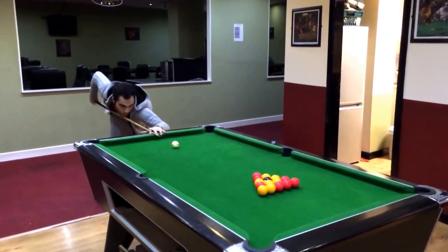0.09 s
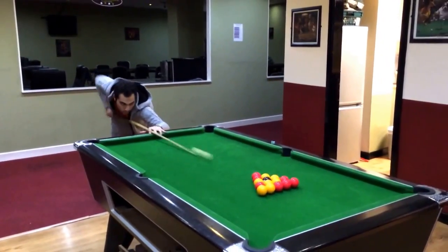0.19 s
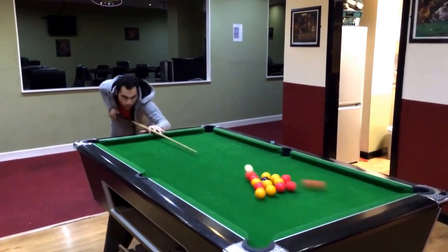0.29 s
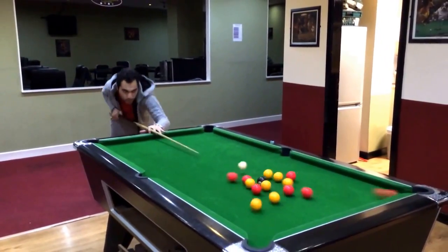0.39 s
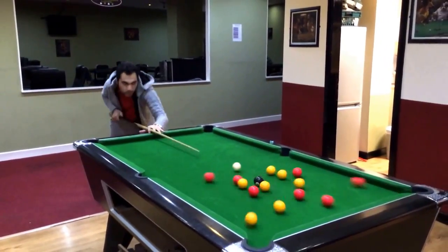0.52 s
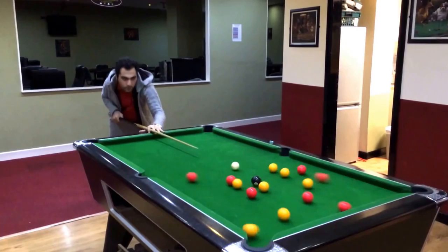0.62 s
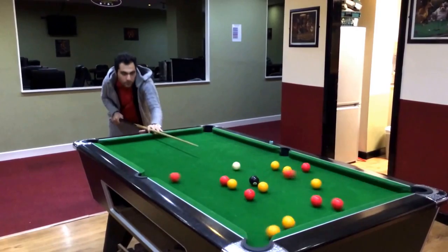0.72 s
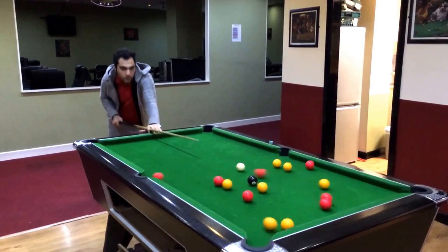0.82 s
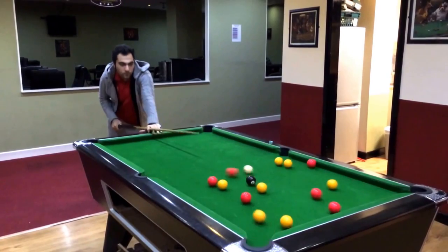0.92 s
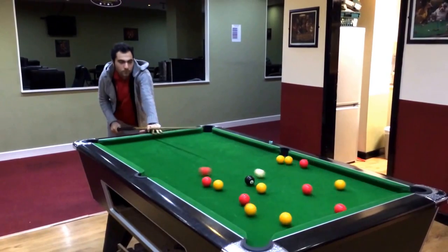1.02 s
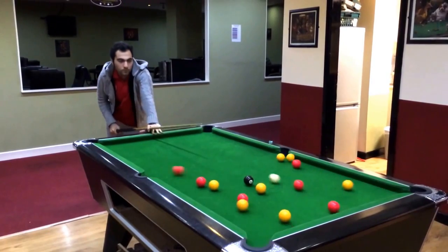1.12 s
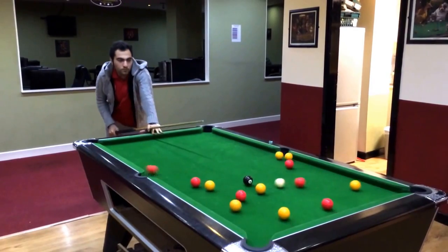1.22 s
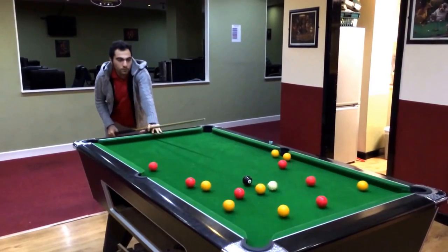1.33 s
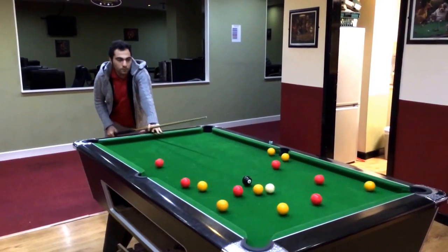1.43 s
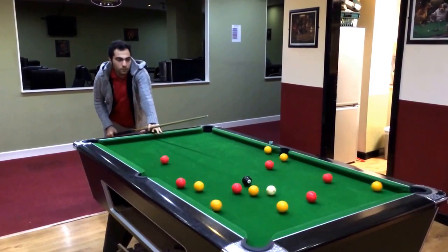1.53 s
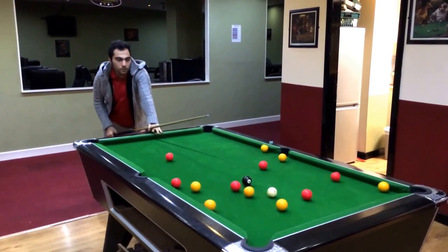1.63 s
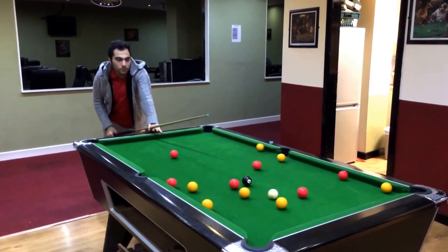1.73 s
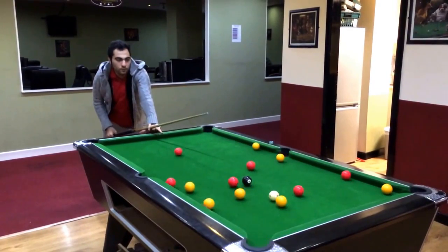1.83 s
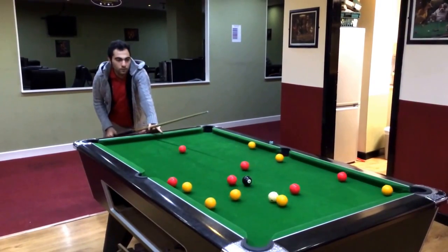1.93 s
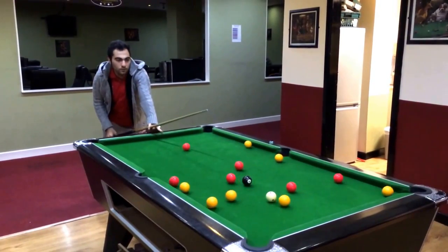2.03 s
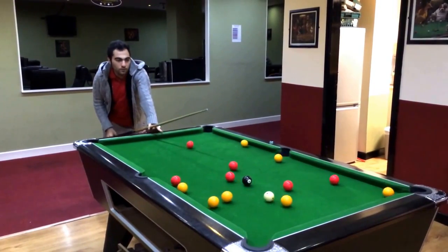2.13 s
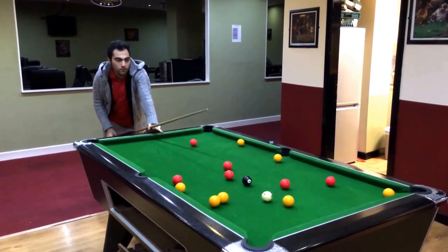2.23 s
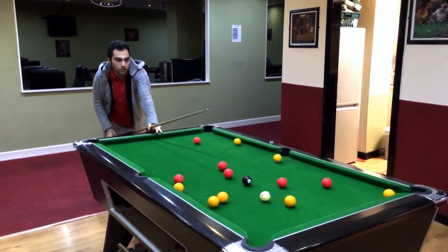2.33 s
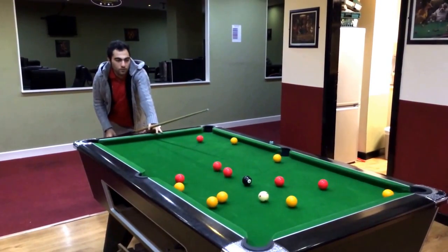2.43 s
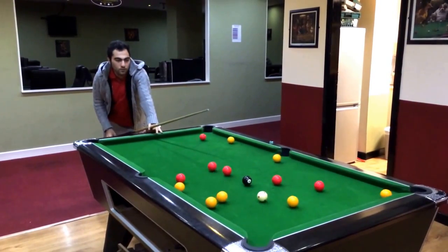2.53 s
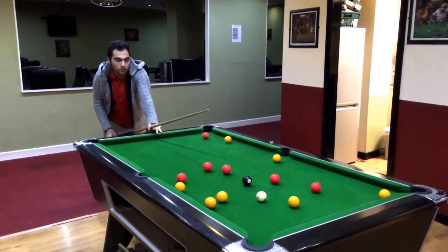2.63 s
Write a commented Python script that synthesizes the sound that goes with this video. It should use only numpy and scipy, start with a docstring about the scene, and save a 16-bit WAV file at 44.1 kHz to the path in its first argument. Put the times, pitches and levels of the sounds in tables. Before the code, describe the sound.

A pool break: a cue strike, a loud crack of balls, scattered clicks and wooden knocks

```python
"""In a room with a slate-bed ball table, a cue strikes and the cue ball cracks into the rack.
Hard balls click by short pressure pulses; cue, cabinet and thin part ring as modes under bursts of impacts.
Cushions thump as low damped sines, knocks on wood are filtered decaying noise, and balls roll as
coloured noise. A cooler hums as a steady sine; room air is a bed of noise and sparse taps reverberate."""
import sys
import numpy as np
from scipy import signal
from scipy.fft import rfft, irfft
from scipy.io import wavfile
from scipy.ndimage import uniform_filter1d

SR = 44100
rng = np.random.default_rng(int(sys.argv[2]) if len(sys.argv) > 2 else 0)


def store_pcm(level_fs):
    """Save levels as 16-bit WAV."""
    pcm = np.round(np.clip(level_fs, -1, 1) * 32767).astype(np.int16)
    wavfile.write(sys.argv[1], SR, np.atleast_2d(pcm).T)


N = 119070  # samples, 2.7 s


def amp(db):
    """Logarithmic level: decibels become an amplitude ratio."""
    return 10 ** (np.asarray(db) / 20)


def evened(x):
    """Normalization of power: the rms becomes 1."""
    return x / np.sqrt(np.mean(x ** 2) + 1e-20)


def unit(x):
    """Normalization of energy: the sum of squares becomes 1."""
    return x / np.linalg.norm(x)


def read(points, hz):
    """Interpolation of a curve along a logarithmic frequency axis."""
    f, value = np.transpose(points)
    return np.interp(np.log(hz + 1), np.log(f + 1), value)


def add(mix, s, sound):
    """Superposition: a sound is summed into the mix from time s [s]."""
    part = mix[round(s * SR):][:len(sound)]
    part += sound[:len(part)]


def decay(t, t60):
    """Exponential damping: the level falls 60 dB in t60 [s]."""
    return amp(-60 * t / t60)


def level_curve(points):
    """Amplitude envelope: levels in dB are joined by straight lines over time."""
    return amp(np.interp(np.arange(N) / SR, *np.transpose(points)))


def coloured(x, points):
    """Linear filtering: the spectrum is weighted by a curve in dB."""
    return irfft(rfft(x) * amp(read(points, np.fft.rfftfreq(len(x), 1 / SR))), len(x))


PAIR_SPREAD = 0.01  # greatest offset of a pair from its mode, as a fraction of the frequency


def modes(table, length, drive):
    """Modal superposition: the drive excites damped sines, each a close beating pair; energy 1."""
    t = np.arange(0, length, 1 / SR)
    total = 0
    for hz, db, t60 in table:
        beat = np.cos(2 * np.pi * hz * PAIR_SPREAD * rng.random() * t)
        ring = decay(t, t60) * np.sin(2 * np.pi * hz * t) * beat
        total = total + amp(db) * np.sqrt(t60) * unit(signal.fftconvolve(drive, ring))
    return unit(total)


def tail(t60s, gap_s, size=SR, hold_s=0):
    """Reverberation: sparse taps of random sign, each band with its own decay time; energy 1."""
    taps = np.zeros(size)
    at = np.arange(0, size - 16, 16)
    taps[at + rng.integers(0, 16, len(at))] = rng.choice([-1., 1.], len(at))
    hz, t, bands = signal.stft(taps, SR, nperseg=256)
    held_t = np.hypot(t, hold_s) - hold_s  # the decay sets in gradually over the hold
    bands = bands * decay(held_t, read(t60s, hz)[:, None])
    out = signal.istft(bands, SR, nperseg=256)[1][:size]
    onset = np.minimum(np.arange(size) / SR / gap_s, 1) ** 2
    return unit(out * onset)


def burst(rise_s, fade_s, per_s, spread_db):
    """Random point process: a rattle of small impacts that swells and fades; norm 20."""
    t = np.arange(0, .2, 1 / SR)
    where, size, sign = rng.random((len(t), 3)).T
    hits = (where < per_s / SR) * amp(-spread_db * np.log(size + 0.00089)) * np.sign(sign - .5)
    envelope = np.minimum(t / rise_s, 1) * np.exp(-np.maximum(t - rise_s, 0) / fade_s)
    return unit(hits * envelope) * 20


# spectrum of the room air: (frequency [Hz], relative level [dB])
AIR_COLOUR = [(25, -28), (175, 15.5), (394, -27.5), (591, -27.5), (14800, -26), (16000, -75)]
AIR_DB = -60.5  # rms


def room_air():
    """Stationary random noise: the coloured bed of the room air."""
    return amp(AIR_DB) * evened(coloured(rng.standard_normal(N), AIR_COLOUR))


# tone of the cooler: (frequency [Hz], rms level [dB])
COOLER_TONES = [(217, -54)]


def cooler_hum():
    """Steady harmonic motion: the cooler hums as a sine with a random starting phase."""
    t = np.arange(N) / SR
    return sum(amp(db) * np.sqrt(2) * np.sin(2 * np.pi * (hz * t + rng.random()))
               for hz, db in COOLER_TONES)


# loudness of balls rolling on the cloth: (time [s], level [dB])
ROLL_LEVEL = [(.21, -51), (.25, -33), (.5, -38), (.95, -51), (1.15, -25.5), (1.4, -48), (1.65, -46),
              (1.9, -47.5), (2.5, -40), (2.7, -46.5)]
# spectrum of the rolling: (frequency [Hz], relative level [dB])
ROLL_COLOUR = [(40, -5), (130, -1), (204, 0.5), (300, -5), (394, 0), (500, -12.5), (930, -11.5),
               (2500, -24.5), (7600, -47.5), (16000, -68.5)]


def rolling():
    """Rolling-contact noise: a random rumble follows the level of the balls on the cloth."""
    return level_curve(ROLL_LEVEL) * evened(coloured(rng.standard_normal(N), ROLL_COLOUR))


# modes of the cue: (frequency [Hz], relative level [dB], decay time t60 [s])
CUE_MODES = [(780, -11.5, 0.0276), (1090, -13, 0.034), (1642, -14.5, 0.11), (1807, -3, 0.053),
             (3020, -1, 0.033), (3584, -13.5, 0.058), (4780, -17, 0.05), (5100, -21, 0.084)]
# spectrum of the strike's hiss: (frequency [Hz], level [dB])
CUE_HISS = [(100, -12.5), (2320, -21.5), (3050, -18), (13200, -44), (16000, -70)]
# decay of the hiss: (frequency [Hz], t60 [s])
CUE_WASH_T60 = [(500, 0.38), (8000, 0.16)]
CUE_S, CUE_DB, CUE_HISS_DB = .2232, -9.5, -6.5  # hiss relative to the cue
CUE_SWELL_S, CUE_FADE_S = 0.013, 0.0069
TIP_HZ, TIP_DB, TIP_T60 = 1072, -1.5, 0.014  # t60 in s


def cue():
    """Modal excitation by impact: the tip thumps while the shaft's modes swell and ring."""
    out, t = np.zeros(N), np.arange(0, .05, 1 / SR)
    drive = burst(CUE_SWELL_S, CUE_FADE_S, 8000, 1.0)
    shaft = modes(CUE_MODES, .4, drive)
    hiss = signal.fftconvolve(coloured(drive, CUE_HISS), tail(CUE_WASH_T60, 0.0031, size=SR // 4))
    tip = -amp(TIP_DB) * decay(t, TIP_T60) * np.sin(2 * np.pi * TIP_HZ * t)
    add(out, CUE_S, amp(CUE_DB) * 20 * shaft)
    add(out, CUE_S, amp(CUE_DB + CUE_HISS_DB) * 20 * hiss)
    add(out, CUE_S, tip)
    return out


CLACK_TURNS = 0.54  # width of the pulse, in cycles
CLACK_RING_T60, SPARK_DB, SPARK_S = 0.0099, -42, .002  # s, dB, s


def clack(db, hz, ring_db):
    """Impact radiation: two hard balls push a brief pulse of air, with a ring and a bright spark."""
    t = np.arange(-441, 442) / SR  # the pulse is centred 10 ms in
    late = np.maximum(t, 0)
    wave = np.sin(2 * np.pi * hz * t)
    pulse = wave * np.exp(-(t * hz / CLACK_TURNS) ** 2)
    ring = wave * (1 - np.exp(-(late * hz) ** 2)) * amp(ring_db) * decay(late, CLACK_RING_T60)
    bright_noise = np.gradient(np.gradient(rng.standard_normal(len(t))))
    spark = bright_noise * (t >= 0) * np.exp(-late / SPARK_S)
    return amp(db) * (pulse / pulse.max() + ring + amp(SPARK_DB) * spark)


# scattered clicks: pitches [Hz]
SCATTER_HZ = (2100, 2600, 3000, 3300)
SCATTER_S, SCATTER_SWELL_S, SCATTER_T60 = .347, 0.014, 0.41  # start, swell and decay in s
SCATTER_PER_S = 3400  # clicks per second, all pitches together, at full density
SCATTER_DB, SCATTER_RING_DB = -20.5, 0.5
SCATTER_SPREAD_DB = 2  # dB per unit of the log of a random size


def scatter():
    """Random point process: clicks of four pitches die away as the rack spreads."""
    out, t = np.zeros(N), np.arange(N) / SR - SCATTER_S
    swell = np.clip(.5 + t / SCATTER_SWELL_S / 2, 0, 1) * (t > 0)
    for hz in SCATTER_HZ:
        where, size = rng.random((N, 2)).T
        sizes = amp(-SCATTER_SPREAD_DB * np.log(size + 1e-3))
        train = (where < SCATTER_PER_S / 4 / SR) * swell * sizes * decay(abs(t), SCATTER_T60)
        out += signal.oaconvolve(train, clack(SCATTER_DB, hz, SCATTER_RING_DB), "same")
    return out


# ball on ball: (time [s], pulse level [dB], pitch [Hz], ring level re pulse [dB])
BALL_CLACKS = [(0.3462, 0, 1890, -19), (0.3483, -8.5, 2780, -18), (0.357, -3, 2710, -5),
               (0.371, -8.5, 3080, 6), (0.3753, -8.5, 2620, -12), (0.3847, -4, 2730, -11),
               (0.3919, -6.5, 2000, -22), (0.4098, -10, 2330, -4), (.452, -21, 2340, 5),
               (0.8036, -9, 2070, -14), (0.8825, -24.5, 2470, -7), (0.8941, -17.5, 2130, -14),
               (1.1857, -3.5, 2190, -9.5), (1.2701, -7.5, 2320, -7.5), (1.28, -17, 1860, -3),
               (1.471, -19.5, 2290, -8), (1.481, -25.5, 2037, -11), (2.317, -24.5, 2110, -11)]
# echoes off slate and rails: (delay [s], level [dB])
CLACK_ECHOES = [(0.0123, -20.5)]
# dense scatter off nearby balls and rails: (frequency [Hz], t60 [s])
NEAR_T60 = [(1000, 0.15), (3000, 0.069), (10000, 0.028)]
NEAR_DB = -8.5


def balls():
    """Impact and reflection: loud clacks and scattered clicks return off balls, slate and rails."""
    out = np.zeros(N)
    for s, db, hz, ring_db in BALL_CLACKS:
        add(out, s - .01, clack(db, hz, ring_db))
    out += scatter()
    near = signal.oaconvolve(out, tail(NEAR_T60, 0.0016, size=SR // 4))[:N]
    echoed = out + amp(NEAR_DB) * near
    for s, db in CLACK_ECHOES:
        add(echoed, s, amp(db) * out)
    return echoed


# knocks on wood: (time [s], level [dB], pitch [Hz], sharpness Q [1], rise [s], hold [s],
# boom re knock [dB], treble re knock [dB])
WOOD_KNOCKS = [(0.5127, -18, 1030, 1.2, 0.0032, 0.016, -7, -55),
               (0.615, -28.5, 780, 2.5, 0.0054, 0.004, -4, -92),
               (1.0046, -17.5, 1054, 1.4, 0.0015, 0.0033, -8.5, -29.5),
               (1.074, -14.5, 2800, 0.55, 0.0048, 0.026, -4.5, -16.5),
               (1.112, -20.5, 1020, 2.6, 0.005, 0.1, -11, -17.5),
               (1.21, -25.5, 965, 4.4, 0.0016, 0.15, -14, -43),
               (1.234, -27, 6140, 0.55, 0.0093, 0.06, -4, -22.5),
               (1.314, -31, 910, 3.4, 0.0014, 0.0094, -28, -26.5),
               (1.914, -10.5, 1700, 0.45, 0.0079, 0.042, -9, -34.5),
               (2.037, -22.5, 750, 1.04, 0.0081, 0.012, 3, -46.5),
               (2.147, -13.5, 1570, 0.45, 0.0069, 0.031, -2.5, -35),
               (2.201, -30.5, 550, 2.3, 0.0025, 0.0087, 10, -35),
               (2.318, -20, 1130, 1.2, 0.015, 0.025, -1, -49),
               (2.362, -26.5, 510, 1.7, 0.0034, 0.0057, 10, -57),
               (2.397, -26.5, 452, 1.2, 0.011, 0.045, -4, -53),
               (2.515, -27, 620, 0.59, 0.0072, 0.01, -5.5, -37)]
# spectrum of the wooden panel: (frequency [Hz], relative level [dB])
WOOD_COLOUR = [(100, -28), (250, 1), (480, 1.5), (1000, 4.5), (3000, 2.5), (6000, -4.5), (16000, -35)]
# decay of the panel: (frequency [Hz], t60 [s])
WOOD_T60 = [(200, 0.4), (1000, 0.24), (4000, 0.15), (12000, 0.067)]
# low modes of the cabinet: (frequency [Hz], relative level [dB], t60 [s])
CABINET_MODES = [(105, -10.5, 0.58), (115.5, -9, 0.64), (185.9, 0.5, 0.69), (216.6, 0.5, 0.42),
                 (283, -6, 0.49), (371, 11, 0.096), (453.6, 8, 0.11), (540, -1, 0.62), (965, -15, 0.63)]
# treble band of the knocks: lower and upper edge [Hz]
TREBLE_HZ = (2640, 7530)
TREBLE_T60 = 0.37  # s, on top of the panel's own decay
RATTLE_PER_S, RATTLE_SPREAD_DB = 2300, 4.5  # impacts per second; dB per unit of log size
LUMP_S, LUMP_DB = .004, 2.5  # smoothing of the level's wobble and its rms
FIRST_BLOW = 0.14  # one sample, against a panel of energy 1


def shudder(rise_s, hold_s):
    """Amplitude modulation: the panel's noise dies with a lumpy level, and one blow stands at its rise."""
    panel = tail(WOOD_T60, rise_s, size=SR // 2, hold_s=hold_s)
    lumps = evened(uniform_filter1d(rng.standard_normal(len(panel)), round(LUMP_S * SR)))
    panel = unit(panel * amp(LUMP_DB * lumps))
    add(panel, rise_s, np.array([FIRST_BLOW]))
    return panel


def knocks():
    """Resonant filtering: a panel shudders about its own pitch and the cabinet's low modes boom."""
    out = np.zeros(N)
    for s, db, hz, sharp, rise_s, hold_s, boom_db, treble_db in WOOD_KNOCKS:
        drive = burst(rise_s, hold_s, RATTLE_PER_S, RATTLE_SPREAD_DB)
        panel = shudder(rise_s, hold_s)
        w = 2 * np.pi * hz
        resonance = signal.bilinear([1], [1 / w ** 2, 1 / (w * sharp), 1], SR)  # low-pass with peak Q
        soft = signal.lfilter(*resonance, coloured(panel, WOOD_COLOUR))
        hard = signal.lfilter(*signal.butter(2, TREBLE_HZ, "band", fs=SR), panel)
        hard = hard * decay(np.arange(len(hard)) / SR, TREBLE_T60)
        add(out, s, 20 * amp(db) * (unit(soft) + amp(treble_db) * unit(hard)))
        add(out, s, 20 * amp(db + boom_db) * modes(CABINET_MODES, 1.0, drive))
    return out


# cushion thumps: (time [s], level [dB], pitch [Hz])
CUSHION_THUMPS = [(0.75, -29.5, 113.8), (0.852, -36, 109), (0.894, -32.5, 111), (1.351, -28.5, 92.7)]
THUMP_RISE_S, THUMP_T60 = 0.0012, 0.19  # s


def thumps():
    """Damped oscillation: rubber cushions push the frame into a low soft ring."""
    out, t = np.zeros(N), np.arange(0, .3, 1 / SR)
    envelope = decay(t, THUMP_T60) * (1 - np.exp(-t / THUMP_RISE_S))
    for s, db, hz in CUSHION_THUMPS:
        add(out, s, amp(db) * envelope * 2 * np.sin(2 * np.pi * hz * t))
    return out


# loudness of a potted ball running down its channel: (time [s], level [dB])
CHANNEL_LEVEL = [(1.0, -90), (1.12, -44), (1.3, -56.5), (1.95, -53), (2.1, -37.5), (2.3, -35),
                 (2.42, -37.5), (2.6, -46), (2.7, -71.5)]


def channel_run():
    """Modal response to random forcing: a potted ball in its channel rings the cabinet's modes."""
    ringing = modes(CABINET_MODES, 0.57, rng.standard_normal(N))[:N]
    return level_curve(CHANNEL_LEVEL) * evened(ringing)


# light ticks on a thin part: (time [s], level [dB])
THIN_TICKS = [(2.415, -29), (2.528, -33.5), (2.569, -39.5)]
# modes of the thin part: (frequency [Hz], relative level [dB], t60 [s])
THIN_MODES = [(1800, -16, 0.033), (2206, 5, 0.1), (2446, 19.5, 0.027), (3100, 3, 0.054), (3660, 4.5, 0.08),
              (4040, 4, 0.11), (5140, -9, 0.032), (6900, -21, 0.08)]
# spectrum of the ticks' wash: (frequency [Hz], relative level [dB])
TICK_HISS = [(1000, 3.5), (2200, 9.5), (4500, -3.5), (8000, -17), (16000, -40)]
# decay of the wash: (frequency [Hz], t60 [s])
TICK_HISS_T60 = [(2000, 0.37), (12000, 0.24)]
TICK_S, TICK_HISS_DB = 0.0061, -0.5  # fade of the rattle; wash relative to the modes


def ticks():
    """Modal excitation by repeated impact: short rattles ring a thin part, with a noisy wash."""
    out = np.zeros(N)
    for s, db in THIN_TICKS:
        drive = burst(0.0026, TICK_S, 4000, 0.84)
        ringing = modes(THIN_MODES, .5, drive)
        scattered = coloured(tail(TICK_HISS_T60, 0.00067, size=SR // 2), TICK_HISS)
        wash = unit(signal.fftconvolve(drive, scattered))
        add(out, s, 20 * amp(db) * (ringing + amp(TICK_HISS_DB) * wash))
    return out


# reverberation of the room: (frequency [Hz], t60 [s])
ROOM_T60 = [(200, 0.62), (1000, 0.52), (3000, 0.6), (8000, 0.29), (14000, 0.55)]
ROOM_GAP_S = 0.0049  # onset of the reverberation
ROOM_DB, CLACK_ROOM_DB = -15.5, -14  # sent to the room by the other impacts and by the clacks


def scene():
    """Superposition: clacks, cue, knocks and ticks excite the room; the other sounds join directly."""
    steady = room_air() + cooler_hum() + rolling()
    struck, clacks = cue(), balls()
    struck = struck + knocks() + ticks()
    sent = amp(CLACK_ROOM_DB) * clacks + amp(ROOM_DB) * struck
    wet = signal.fftconvolve(sent, tail(ROOM_T60, ROOM_GAP_S))[:N]
    return (clacks + struck + wet + thumps() + channel_run() + steady)[None]


MIC_HZ, EDGE_HZ = 74, 15500  # lower and upper band limits
OVERLOAD = .95  # clipping amplitude


def record(dry):
    """Transducer limits: a small microphone lacks deep bass, clips high peaks and ends the treble."""
    thin = signal.lfilter(*signal.butter(2, MIC_HZ, "high", fs=SR), dry)
    clipped = np.clip(thin, -OVERLOAD, OVERLOAD)
    band_limit = signal.firwin(511, EDGE_HZ, window=("kaiser", 9), fs=SR)
    return signal.oaconvolve(clipped, band_limit[None], "same")


dry = scene()
out = record(dry)
store_pcm(out)
```